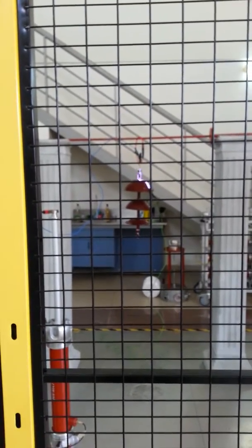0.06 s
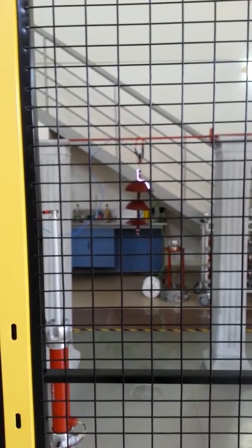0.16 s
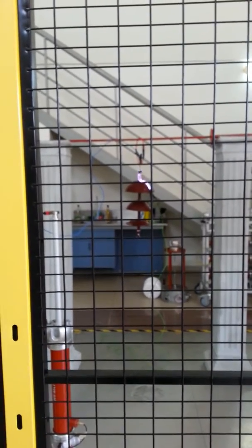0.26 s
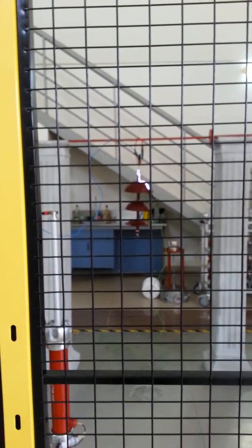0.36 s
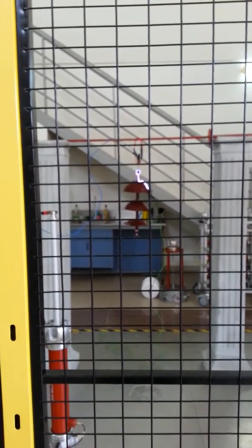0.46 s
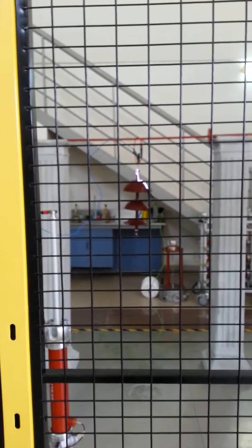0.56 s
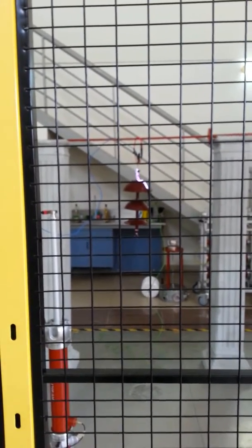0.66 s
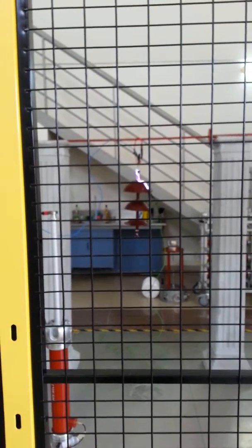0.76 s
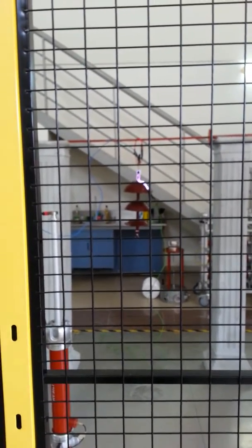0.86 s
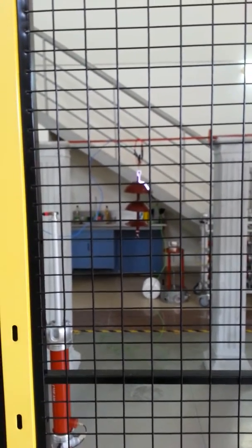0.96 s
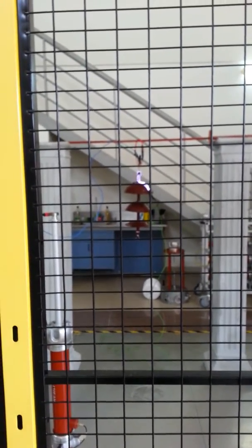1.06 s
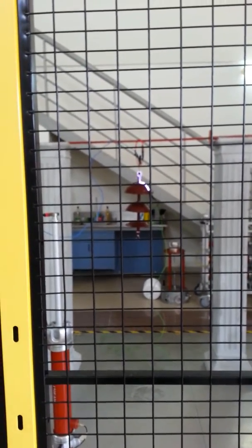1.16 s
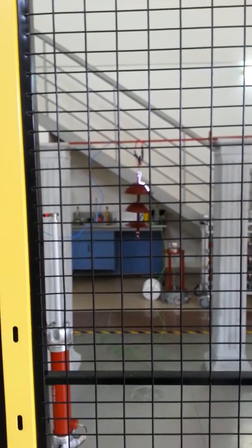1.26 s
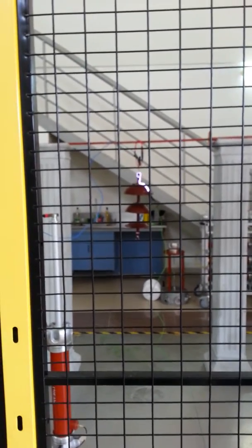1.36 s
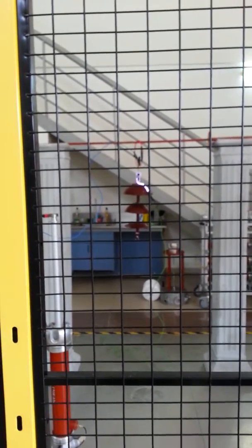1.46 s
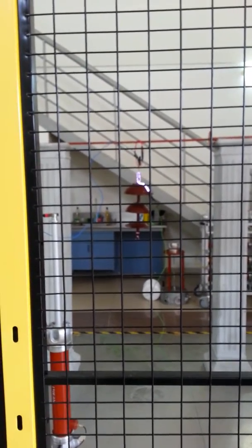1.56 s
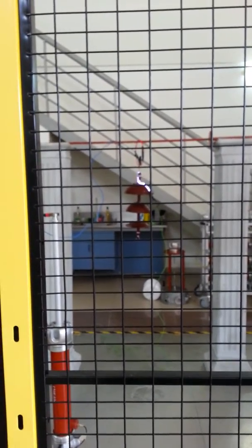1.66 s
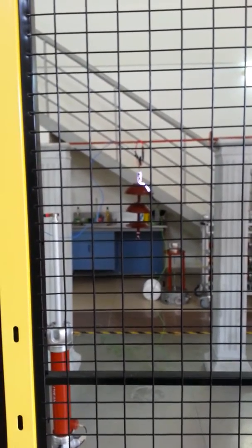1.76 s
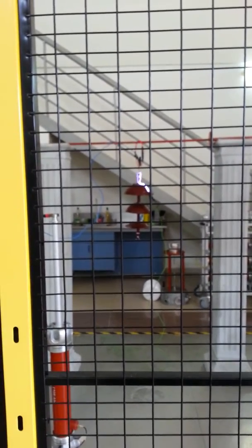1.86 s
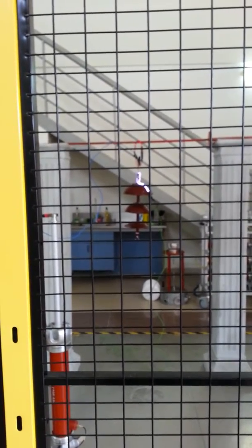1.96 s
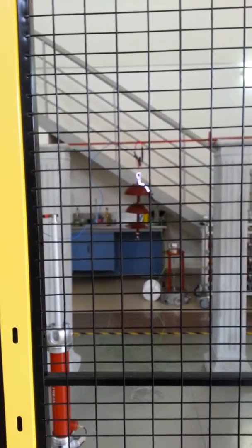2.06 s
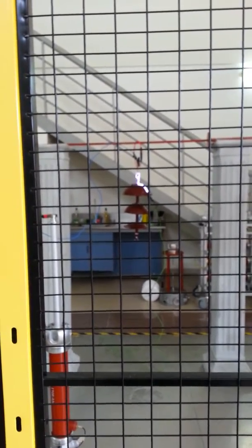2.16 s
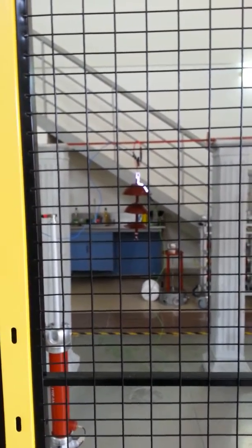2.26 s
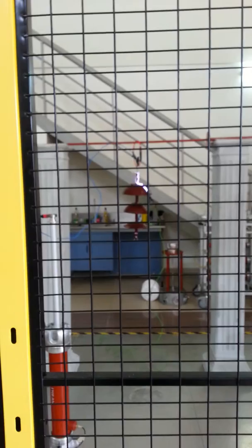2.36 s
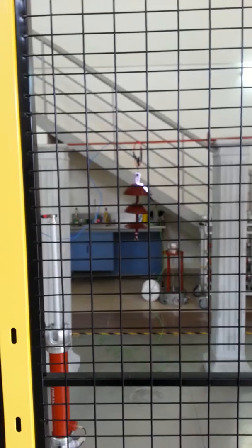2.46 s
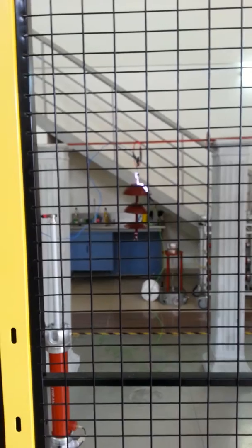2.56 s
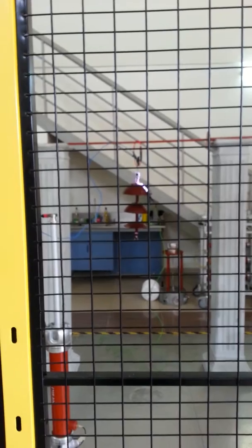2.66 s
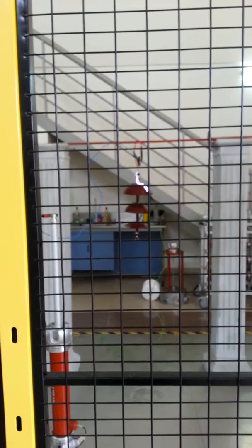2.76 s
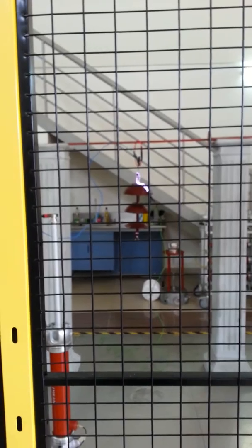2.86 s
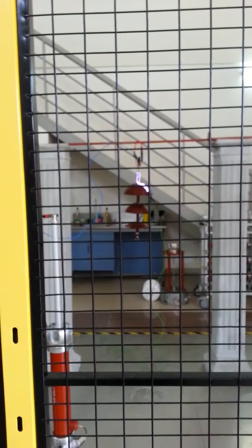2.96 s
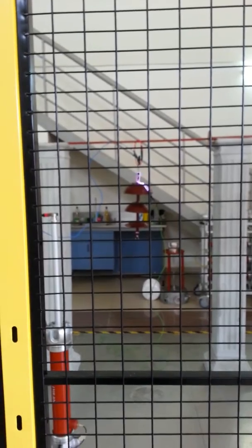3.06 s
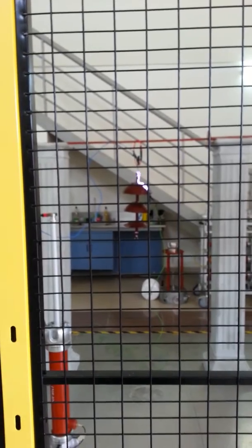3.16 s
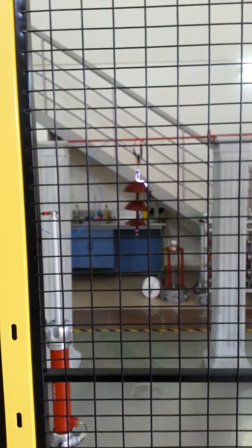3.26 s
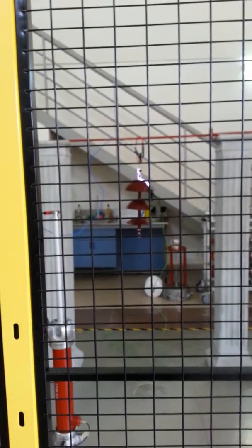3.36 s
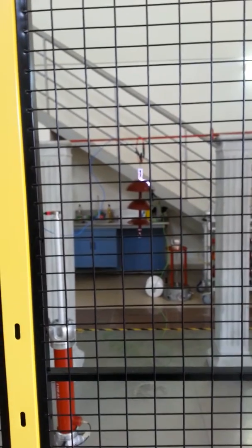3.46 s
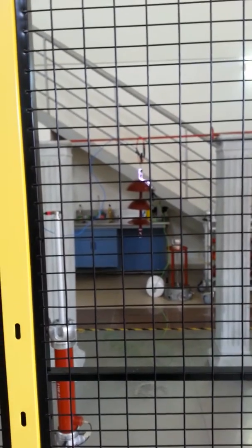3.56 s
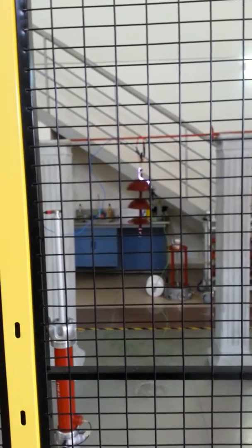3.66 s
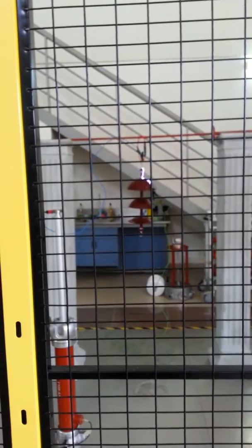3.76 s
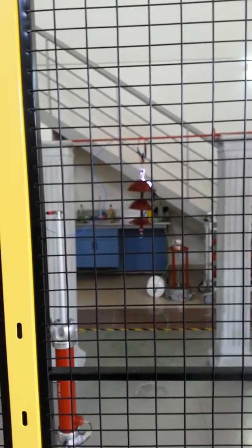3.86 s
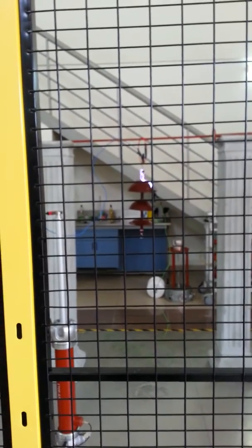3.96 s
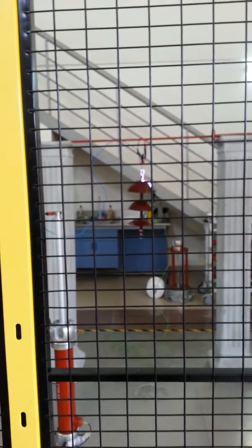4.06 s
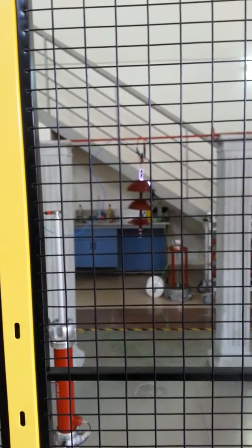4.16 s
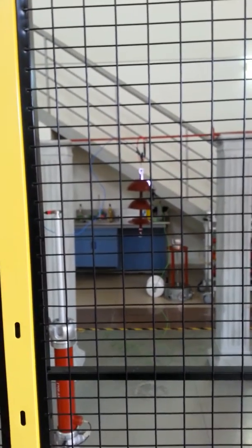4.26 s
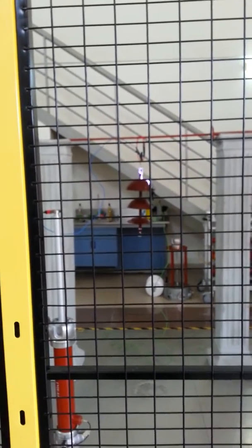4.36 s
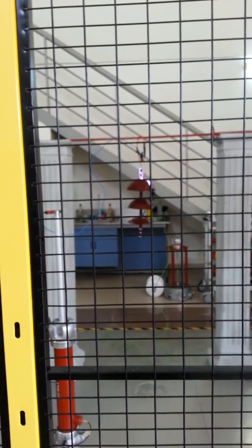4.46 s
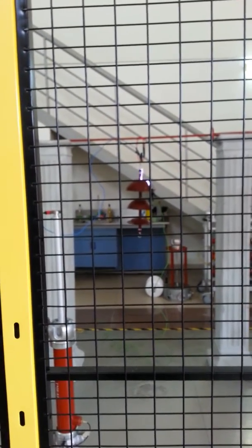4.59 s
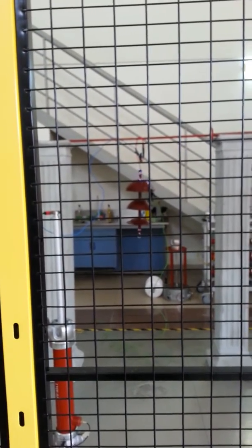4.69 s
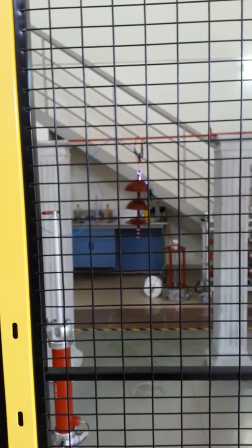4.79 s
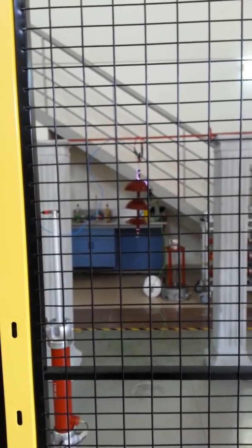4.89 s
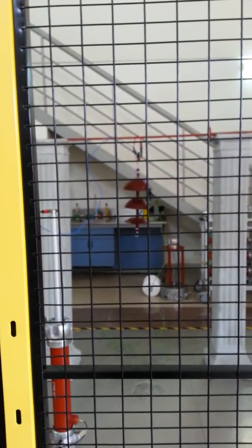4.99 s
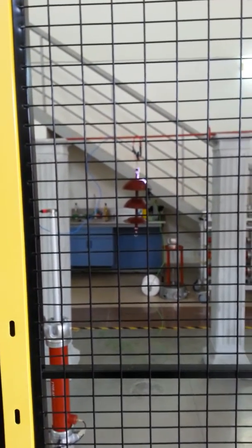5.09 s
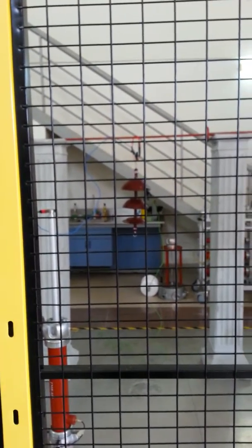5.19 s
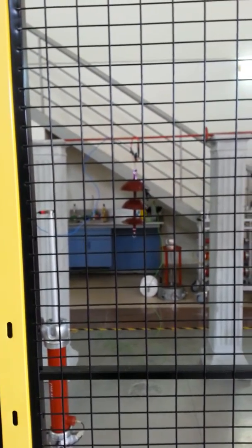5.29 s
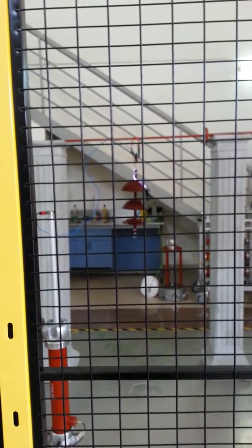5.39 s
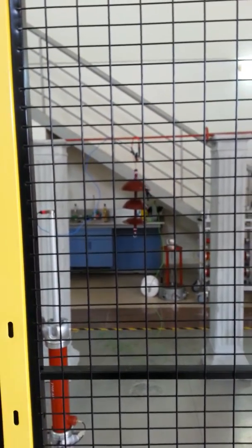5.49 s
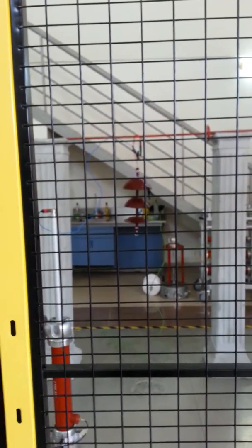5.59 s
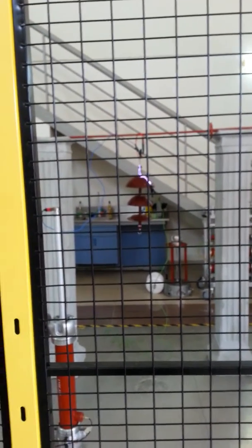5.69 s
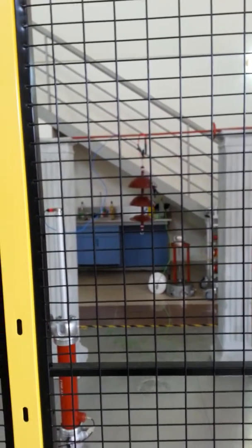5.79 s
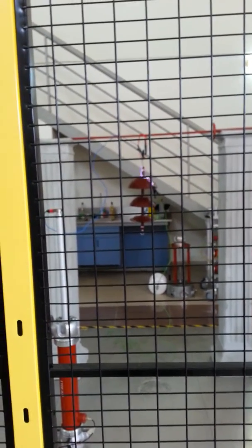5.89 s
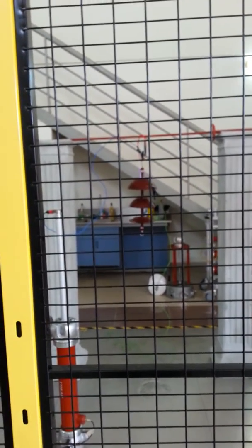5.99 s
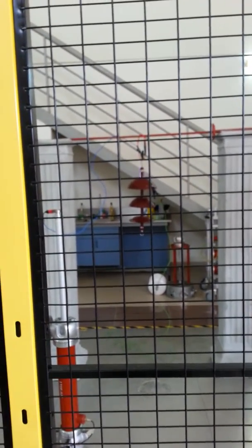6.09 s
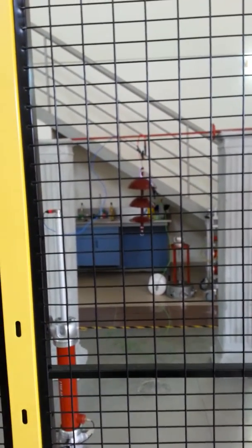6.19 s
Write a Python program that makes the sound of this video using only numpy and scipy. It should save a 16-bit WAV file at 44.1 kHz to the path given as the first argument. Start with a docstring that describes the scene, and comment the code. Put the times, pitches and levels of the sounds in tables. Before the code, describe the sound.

In a large hall, countless tiny sparks merge into a continuous high sizzle on a wet insulator, with light crackle and short, dull electrical pops in the microphone. After several seconds an arc cracks loudly, briefly distorting the phone's sound. The sizzle carries on, then turns duller and uneven, breaking into quick single snaps as two further loud cracks go off. The room rumbles faintly underneath.

```python
"""Discharge on a wet insulator in a high-voltage hall: countless small sparks merge into a diffuse
hiss that thins into single snaps as the arc dies. The hall rumbles faintly. At the crests of the mains
voltage come dull thumps of either polarity, often in just one of the two microphones, probably induced
in its wiring. Three flashovers crack and overload the phone."""
import sys
import numpy as np
from scipy import signal
from scipy.fft import rfft, irfft, next_fast_len
from scipy.io import wavfile
from scipy.ndimage import uniform_filter1d, map_coordinates

SR = 44100
rng = np.random.default_rng(int(sys.argv[2]) if len(sys.argv) > 2 else 0)


def store_wav(level_fs):
    """Save 16-bit WAV to argv[1]."""
    pcm = np.round(np.clip(np.atleast_2d(level_fs), -1, 1) * 32767)
    wavfile.write(sys.argv[1], SR, pcm.T.astype(np.int16))


N = 274743
CREST_HZ, FIRST_CREST_S = 100.054, 0.007  # two voltage crests per mains cycle


def amp(db):
    """Decibels to gain."""
    return 10 ** (np.asarray(db) / 20)


def unit_rms(x):
    """Each channel scaled to rms 1."""
    return x / np.sqrt(np.mean(x ** 2, axis=-1, keepdims=True))


def curve(rows, t):
    """Breakpoint rows interpolated at times t."""
    return np.interp(t, *np.transpose(rows))


def wobble(rate_hz):
    """Smooth random curve, rate_hz knots a second."""
    knots = rng.standard_normal(int(N * rate_hz / SR) + 4)
    return map_coordinates(knots, [np.arange(N) * rate_hz / SR])


def impulses(times_s, gains):
    """Train of single-sample pushes."""
    return np.bincount(np.clip(np.round(times_s * SR).astype(int), 0, N - 1), gains, N)


def hall(x, t60_s):
    """One reverberant path to each port; leaves a comb of narrow peaks on steady sound."""
    t = np.arange(SR // 2) / SR
    paths = amp(-60 * t / t60_s) * rng.standard_normal((2, len(t)))
    return signal.fftconvolve(x, paths / np.linalg.norm(paths[0]), mode="valid", axes=1)


# Arc strength, steady then sputtering: time_s, level_db
ARC_LEVEL = [(0, -17), (3.74, -16.5), (3.795, -18), (3.84, -16.5), (4.78, -17), (5.03, -17.5), (5.09, -18),
             (5.14, -18.5), (5.206, -19.5), (5.218, -17.5), (5.38, -20.5), (5.442, -18), (5.474, -23.5),
             (5.506, -17.5), (5.526, -21), (5.566, -17), (5.6, -23.5), (5.635, -20.5), (5.686, -27.5),
             (5.696, -20), (5.745, -17), (5.79, -23.5), (5.822, -22), (5.872, -17.5), (5.93, -26),
             (6.0, -22), (6.048, -26.5), (6.056, -16.5), (6.076, -22), (6.085, -24), (6.133, -24),
             (6.143, -20), (6.198, -25.5), (6.205, -19.5), (6.23, -22.5)]


def hiss():
    """Merged small sparks: diffuse noise, slightly stronger at each crest, duller as the arc fades."""
    full_arc_db, full_tilt_db_per_oct = -17, 0.5
    fade_dulling, spurt_body = 0.32, 0.28  # dB/octave per dB
    t = np.arange(N) / SR
    level_db = curve(ARC_LEVEL, t)
    mean_db = uniform_filter1d(level_db, size=int(0.3 * SR))
    tilt_db_per_oct = full_tilt_db_per_oct + fade_dulling * (mean_db - full_arc_db)
    tilt_db_per_oct -= spurt_body * (level_db - mean_db)  # spurts are fuller than lulls
    arc = hall(rng.standard_normal((1, N + SR // 2 - 1)), t60_s=0.23)
    diffuse = rng.standard_normal((2, N))
    hz, frames_s, spectrum = signal.stft(amp(-1.5) * arc + diffuse, SR, nperseg=256)
    octaves = np.log2((hz[:, None] + 500) / 7000)
    flicker = uniform_filter1d(rng.standard_normal(spectrum.shape), 6, axis=1)
    flicker = uniform_filter1d(flicker, 10, axis=2)
    colour_db = octaves * np.interp(frames_s, t, tilt_db_per_oct) + 0.9 * flicker / flicker.std()
    noise = signal.istft(spectrum * amp(colour_db), SR, nperseg=256)[1][:, :N]
    ripple_db = 0.12 * np.cos(2 * np.pi * CREST_HZ * (t - FIRST_CREST_S + 0.0013))
    return unit_rms(noise) * amp(level_db + ripple_db + 0.17 * wobble(rate_hz=30))


def rumble(band_hz=(40, 160), level_db=-50):
    """Low hall background, same in both channels."""
    band = signal.butter(2, band_hz, "band", fs=SR, output="sos")
    return amp(level_db) * unit_rms(signal.sosfilt(band, rng.standard_normal(N)))


# Single sparks of the dying arc: start_s, level_db
SNAPS = [(4.965, 0.1), (5.0902, -3.3), (5.1129, -2.3), (5.2137, -2.7), (5.2862, -2.6), (5.3729, -2.9),
         (5.4111, -3.9), (5.4528, 0.6), (5.5036, -3.0), (5.5734, -1.6), (5.593, -3.3), (5.6058, -3.7),
         (5.6231, -4.1), (5.6526, -1.7), (5.6656, -4.3), (5.6957, -3.1), (5.7536, 2.4), (5.7774, -0.7),
         (5.8131, -3.6), (5.913, -2.6), (5.9259, -3.2), (5.9527, -2.6), (5.9639, -2.2), (5.9731, -2.9),
         (5.9859, -4.1), (6.0018, -5.7), (6.033, -3.4), (6.0729, 0.6), (6.1026, -5.1), (6.1331, -2.2),
         (6.146, -1.4), (6.1729, -3.2), (6.1858, -4.3), (6.2062, -5.3)]


def sparks():
    """Single snaps over a random crackle of lesser ones, each with short near echoes."""
    start_s, level_db = np.transpose(SNAPS)
    when, strength = rng.random((900, 2)).T
    crackle_s = when * N / SR
    crackle_db = curve(ARC_LEVEL, crackle_s) + 7 + 1.9 * strength
    train = impulses(start_s, amp(level_db)) + impulses(crackle_s, amp(crackle_db))
    t = np.arange(SR // 20) / SR
    snap = amp(-21 - 60 * t / 0.048) * rng.standard_normal((2, len(t)))  # echoes
    snap[[0, 1], [3, 0]] = 1.4  # direct sound, 3 samples later on the left
    snap += amp([[-9], [-20]]) * np.exp(-t / 0.00016)  # heated air pushes on: fuller, mostly left
    return signal.fftconvolve(train[None], snap, axes=1)[:, :N]


# Strongest thumps, signed: start_s, left_gain, right_gain
LOUD_THUMPS = [(0.1984, 0.0, -0.27), (0.3069, 0.28, -0.25), (0.3964, 0.0, 0.3), (0.4271, 0.23, -0.13),
               (0.5071, 0.0, -0.28), (0.6363, 0.0, -0.3), (0.6764, 0.0, -0.31), (0.7168, 0.0, -0.31),
               (0.807, 0.36, -0.16), (0.8376, -0.21, -0.11), (0.9568, 0.33, -0.11), (1.0153, 0.0, -0.35),
               (1.017, 0, 0.25), (1.0665, 0.0, 0.31), (1.2258, 0.0, 0.27), (1.6061, 0.0, -0.27),
               (1.6866, 0.29, 0.22), (1.9273, 0.1, 0.28), (2.2266, 0.28, 0.0), (2.2465, 0.17, 0.25),
               (2.2758, 0.0, 0.29), (2.3069, 0.23, -0.08), (2.327, 0.2, 0.24), (2.3364, -0.22, -0.09),
               (2.3958, 0.0, 0.27), (2.5766, 0.0, 0.36), (2.6258, 0.28, 0), (2.6365, -0.23, 0.08),
               (2.8055, 0.0, -0.32), (2.8692, 0.0, 0.27), (2.9249, 0.0, -0.34), (3.1948, 0, -0.29),
               (3.2867, 0.26, 0), (3.3443, 0, -0.27), (3.5758, 0.0, -0.27), (3.6651, 0.33, -0.23),
               (3.7462, 0.73, -0.24), (3.7651, -0.35, -0.35), (3.7759, 0.0, 0.29), (3.9952, 0.29, 0.14),
               (4.0163, 0.0, -0.28), (4.0948, 0.29, 0.22), (4.1362, 0.0, -0.32), (4.1967, 0.0, -0.33),
               (4.3743, 0.0, -0.27), (4.6255, 0.0, -0.33), (4.6547, 0.0, 0.33), (4.6654, 0.0, -0.34),
               (4.7351, 0.4, 0.0), (4.7955, -0.2, 0.48), (4.8144, -0.09, -0.29), (4.8736, 0.0, 0.15),
               (4.8935, 0.0, -0.33), (4.904, 0.0, 0.32), (4.9944, 0.0, 0.31), (5.1046, 0.0, -0.39),
               (5.1358, 0.0, 0.14), (5.1551, 0.0, 0.57), (5.1568, 0, -0.45), (5.1765, 0.0, -0.59),
               (5.2141, 0.0, 0.18), (5.3735, 0.0, -0.27), (5.7543, 0.0, -0.82), (5.7562, 0, 0.35),
               (5.8134, 0.0, 0.41), (6.0336, 0.0, -0.19), (6.0733, 0.0, 0.2)]
# Upper limit of the weaker thumps, dying with the arc: time_s, level_db
WEAK_THUMP_LEVEL = [(0, -12.5), (2.4, -13), (4.75, -14), (5.0, -32), (5.3, -29), (6.23, -39)]


def thumps(rise_s=0.00054, jitter_s=0.00089, highpass_hz=72):
    """Millisecond electrical pushes near voltage crests; the input high-pass adds a slow swing back."""
    drive, rarity = (0.044, 1.4), (4, 2)  # left, right
    start_s, *loud_gains = np.transpose(LOUD_THUMPS)
    crests_s = FIRST_CREST_S + np.arange(int(N / SR * CREST_HZ)) / CREST_HZ
    strength, offset, polarity = rng.standard_normal((len(crests_s), 6)).T.reshape(3, 2, -1)
    sign = np.sign(signal.lfilter([1], [1, 0.55, 0.45], polarity))  # tends to undo the last two pushes
    limit = amp(curve(WEAK_THUMP_LEVEL, crests_s))
    taken = np.abs(crests_s[:, None] - start_s).argmin(axis=0)
    limit[taken] = 0  # no weak thump on a loud one's crest
    trains = []
    for side in range(2):
        weak_gains = sign[side] * limit * np.tanh(drive[side] * strength[side] ** rarity[side])
        weak = impulses(crests_s + jitter_s * offset[side], weak_gains)
        trains.append(impulses(start_s - rise_s, loud_gains[side]) + weak)
    t = np.arange(SR // 25) / SR
    push = t / rise_s * np.exp(1 - t / rise_s)
    pulse = signal.sosfilt(signal.butter(2, highpass_hz, "high", fs=SR, output="sos"), push)
    return signal.fftconvolve(trains, amp(1.0) * pulse[None] / pulse.max(), axes=1)[:, :N]


# Flashovers: start_s, level_db, hold_s, fall_s
FLASHES = [(3.747, -8.5, 0.029, 0.0089), (5.152, -8.5, 0.031, .006), (5.755, -6.5, 0.016, 0.0089)]


def flashovers(body_hz=900):
    """Sudden roar of the whole hall, held briefly; the long spark channel adds bass."""
    t, envelope = np.arange(N) / SR, np.zeros(N)
    for start_s, level_db, hold_s, fall_s in FLASHES:
        fall = np.clip((t - start_s - hold_s) / fall_s, -20, 20)
        envelope += (t > start_s) * amp(level_db) / (1 + np.exp(fall))
    roar = rng.standard_normal((2, N))
    body = unit_rms(signal.sosfilt(signal.butter(2, body_hz, fs=SR, output="sos"), roar))
    return envelope * (roar + amp([[-19], [-15]]) * body)


# Spark colour through each microphone port: frequency_hz, relative_db
LEFT_COLOUR = [(40, -51), (150, -19), (300, -13.5), (1200, -14.5), (2500, -11.5), (4400, -5), (5300, -1.5),
               (5800, -0.5), (6800, -0.5), (7500, -5.5), (9000, -6), (11000, -9.5), (14500, -13)]
RIGHT_COLOUR = [(40, -60), (150, -20.5), (400, -18.5), (1200, -22.5), (2500, -19.5), (4000, -16),
                (5000, -14.5), (5800, -10), (6600, -5), (7100, -1.5), (7600, -1), (8200, -5.5), (9000, -10),
                (11000, -14), (14500, -18)]


def port(colour, size=2048):
    """Microphone port: minimum-phase impulse response of energy 1."""
    frequency_hz, relative_db = np.transpose(colour)
    bins_hz = np.fft.rfftfreq(size, 1 / SR)
    gain = amp(np.interp(np.log(bins_hz + 1), np.log(frequency_hz), relative_db))
    cepstrum = irfft(np.log(gain), size)
    cepstrum[1:size // 2] *= 2
    cepstrum[size // 2 + 1:] = 0
    response = irfft(np.exp(rfft(cepstrum)), size)
    return response / np.linalg.norm(response)


def scene():
    """Discharge sound through the ports; thumps and rumble added after them."""
    discharge = hiss() + flashovers() + sparks()
    ports = amp(5.5) * np.array([port(LEFT_COLOUR), port(RIGHT_COLOUR)])
    return signal.fftconvolve(discharge, ports, axes=1)[:, :N] + thumps() + rumble()


def record(dry, top_hz=14520):
    """Phone overload: soft clip at a ceiling that rises in loud bursts, then a band limit."""
    rms = np.sqrt(np.abs(uniform_filter1d(dry ** 2, size=900, axis=1)))
    ceiling = np.clip(2.7 * rms, 0.76, 1.05)
    clipped = dry / (1 + np.abs(dry / ceiling) ** 6) ** (1 / 6)
    size = next_fast_len(N)
    passband = np.fft.rfftfreq(size, 1 / SR) < top_hz
    return irfft(rfft(clipped, size) * passband, size)[:, :N]


dry = scene()
out = record(dry)
store_wav(out)
```